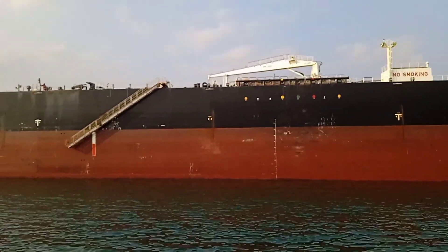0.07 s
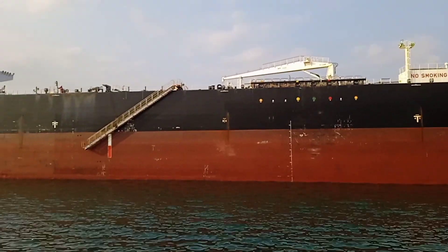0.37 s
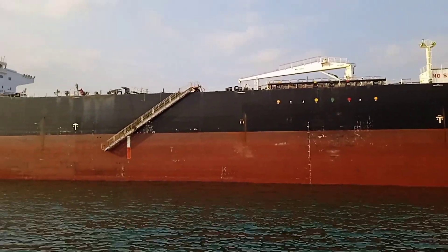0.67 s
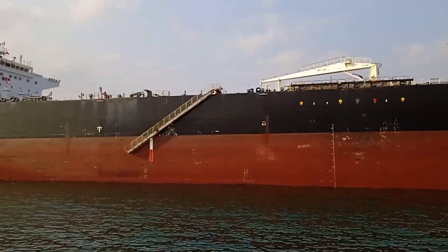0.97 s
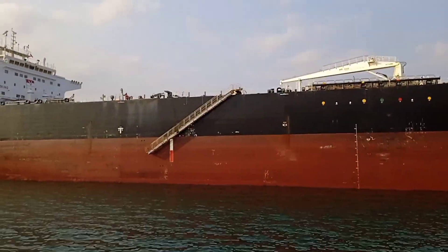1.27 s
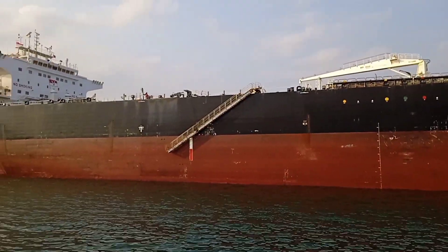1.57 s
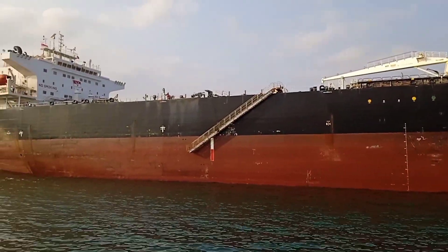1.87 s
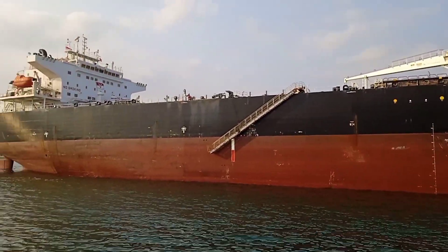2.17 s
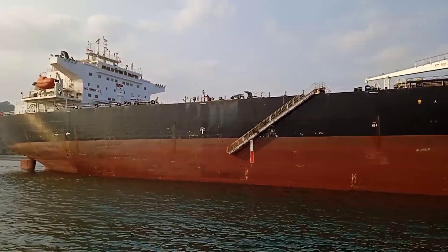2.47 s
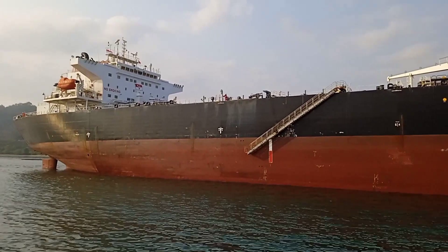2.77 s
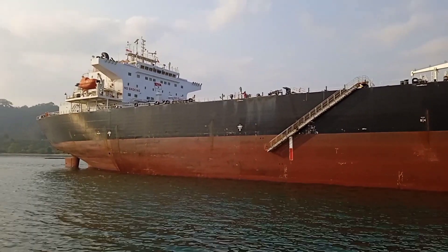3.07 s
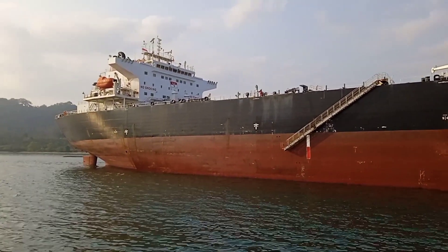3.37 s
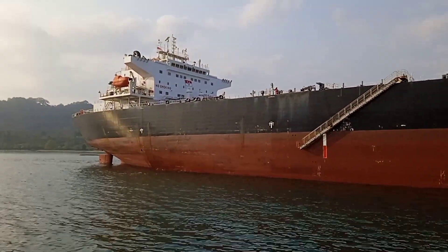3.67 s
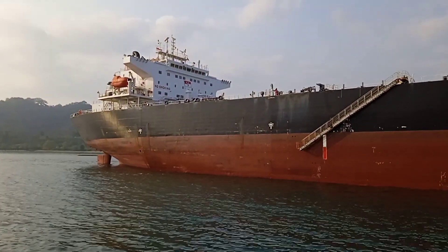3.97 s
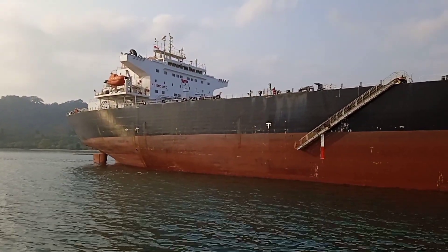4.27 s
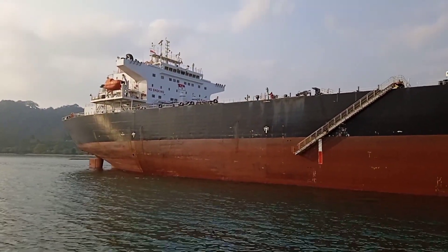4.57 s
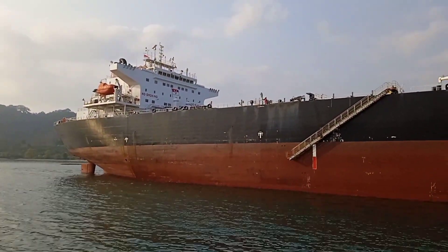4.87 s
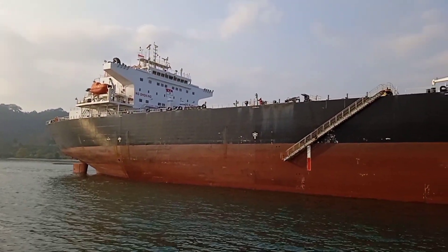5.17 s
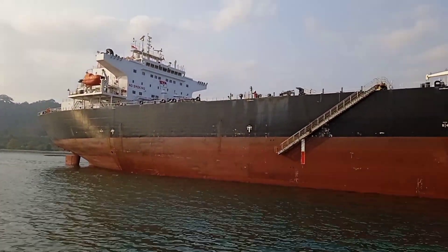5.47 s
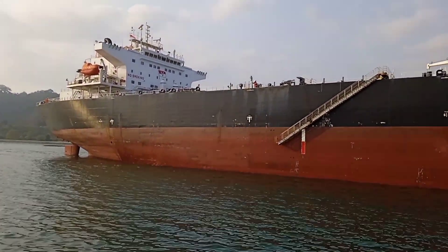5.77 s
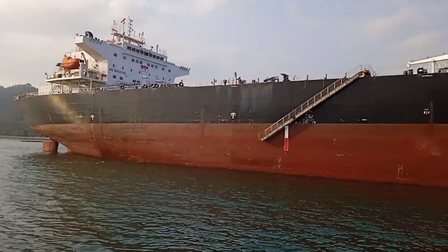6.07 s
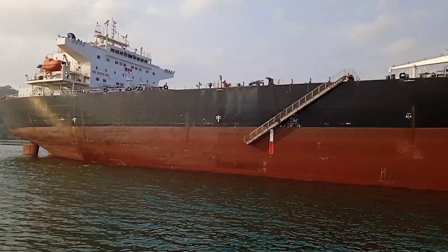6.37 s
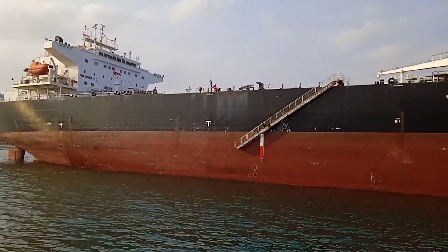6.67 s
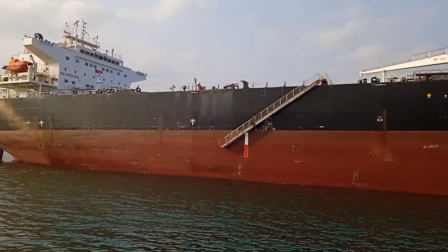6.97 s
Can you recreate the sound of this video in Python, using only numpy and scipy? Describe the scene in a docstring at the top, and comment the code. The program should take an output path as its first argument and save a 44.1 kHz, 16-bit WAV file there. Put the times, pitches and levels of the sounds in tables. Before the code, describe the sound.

A small boat's diesel engine chugs close by for the whole seven seconds, about ten beats a second, with a rattling block, a low puffing exhaust and some knocks harder than others. Behind it, a moored tanker's ventilation makes a steady airy roar with a faint wavering whirr and thin whistles. From the start until about 3.5 seconds, wind gusts buffet the microphone with soft low thumps, the loudest sounds, strongest around 1.1 to 1.4, 1.9, 2.9 and 3.4 seconds. The wind then drops to a light breeze, leaving the engine clearer, with small bumps near 5.6 and 6.8 seconds. Ripples fizz quietly against the hull throughout, and small droplets splash around 1.5, 2.7 and 6.5 seconds. Very faint bird pips come from the distant shore in the first second, just after 3 seconds and near 5.5 seconds.

```python
"""On the water beside a moored tanker, a small boat's five-cylinder diesel chugs steadily.
Each firing knocks, rattles the block and puffs from the exhaust, one cylinder knocking hardest.
The tanker's ventilation roars, whirrs and whistles, ripples fizz along its hull, droplets splash,
and birds pip faintly on the shore. Mostly in the first few seconds, gusts throw eddies
at the microphone, each a soft low thump."""
import sys
import numpy as np
from scipy import signal
from scipy.fft import rfft, irfft, next_fast_len
from scipy.io import wavfile
from scipy.ndimage import uniform_filter1d, map_coordinates

SR = 44100
rng = np.random.default_rng(int(sys.argv[2]) if len(sys.argv) > 2 else 0)


def to_wav(s):
    """Save 16-bit WAV."""
    ch = np.atleast_2d(s).T  # columns
    pcm = np.round(np.clip(ch, -1, 1) * 32767)  # PCM
    wavfile.write(sys.argv[1], SR, pcm.astype(np.int16))


N = 309582
CYCLE_HZ = 9.9445  # engine cycles a second; every cylinder fires once in each


def amp(db):
    """Amplitude ratio: a factor of ten for every 20 decibels."""
    return 10 ** (np.asarray(db) / 20)


def unit(x):
    """Normalisation to rms 1."""
    return x / np.sqrt(np.mean(x ** 2) + 1e-20)


def curves(rows):
    """Linear interpolation: one value per sample for each column after the time."""
    times, *columns = np.transpose(rows)
    return [np.interp(np.arange(N) / SR, times, column) for column in columns]


def wobble(rate_hz):
    """Smooth random modulation: a spline through rate_hz Gaussian values a second."""
    position = np.arange(N) * rate_hz / SR
    steps = np.arange(0, position[-1] + 1, 1 / 8)
    knots = rng.standard_normal(int(position[-1]) + 4)
    return np.interp(position, steps, map_coordinates(knots, [steps]))


def filtered(x, response):
    """Zero-phase filtering: the spectrum of x is multiplied by response(hz)."""
    size = next_fast_len(len(x) + 8192)
    hz = np.fft.rfftfreq(size, 1 / SR) + 1
    return irfft(rfft(x, size) * response(hz), size)[:len(x)]


def coloured(x, spectrum):
    """Spectral shaping by (frequency_hz, gain_db) points, returned at rms 1."""
    points_hz, gain_db = np.transpose(spectrum)
    log_hz = np.log(points_hz)
    return unit(filtered(x, lambda hz: amp(np.interp(np.log(hz), log_hz, gain_db, left=-120, right=-120))))


def band_noise(samples, centre_hz, octaves):
    """Band-limited noise of rms 1 under a Gaussian bell in log frequency."""
    white = rng.standard_normal(samples)
    return unit(filtered(white, lambda hz: np.exp(-.5 * (np.log2(hz / centre_hz) / octaves) ** 2)))


def fading_noise(depth_db):
    """Selective fading: bands of noise swell and sink on their own, as across moving air and water."""
    bands = signal.stft(rng.standard_normal(N), nperseg=1024)[2]
    fading = uniform_filter1d(rng.standard_normal(bands.shape), size=4, axis=0)  # smooth in frequency
    fading = uniform_filter1d(fading, size=7, axis=1)  # and in time
    return signal.istft(bands * amp(depth_db * unit(fading)), nperseg=1024)[1][:N]


def wavering_tone(hz, waver_rad, flutter_db):
    """Phase and amplitude modulation of a sine make it waver and flutter; rms 1."""
    phase = 2 * np.pi * np.cumsum(hz) / SR + waver_rad * wobble(70)
    flutter = 1.85 * np.tanh(wobble(32) / 1.8)  # extremes softly limited
    return unit(amp(flutter_db * flutter) * np.sin(phase))


def add(track, start_s, sound):
    """Superposition: mix a sound in from start_s, cut to the track."""
    at = np.arange(len(sound)) + round(start_s * SR)
    inside = (at >= 0) & (at < N)
    track[at[inside]] += sound[inside]


def diesel(block_db=-53.0, exhaust_db=-43.5, knock_hz=550, knock_width_s=.0023, t60_s=0.053, throb=0.35):
    """Impulse excitation: each firing knocks and sets the block rattling; the exhaust puffs in step."""
    # firings in one engine cycle: delay_s, knock_db, shake_db
    cylinders = [(-.001, -42, -2), (.015, -51, -4), (.0395, -47.5, -4), (.062, -52, -6.5),
                 (.079, -50, -4.5)]
    # hardest knocks of the first cylinder: time_s, level_db
    hard_knocks = [(.199, -36.5), (.602, -38), (.703, -38), (.904, -37), (1.003, -37), (1.808, -37),
                   (2.011, -35.5), (2.312, -35.5), (2.412, -36.5), (3.217, -37), (3.519, -37), (3.72, -38),
                   (3.82, -36), (3.921, -37), (4.121, -34), (4.223, -37.5), (4.323, -34.5), (4.726, -37),
                   (4.827, -37.5), (4.927, -37.5), (5.228, -38), (5.731, -37.5), (5.933, -37.5),
                   (6.032, -35.5), (6.334, -37.5), (6.433, -36.5), (6.838, -37.5)]
    # resonances of the engine block: frequency_hz, gain_db
    block_spectrum = [(150, -45), (240, -5), (292, 0.5), (330, 0), (357, -8.5), (380, -3.5), (450, -2.5),
                      (490, -3.5), (560, -8.5), (595, -5.5), (630, -10), (700, -7), (800, -8.5),
                      (1200, -27.5), (2500, -47)]
    # spectrum of the exhaust: frequency_hz, gain_db
    exhaust_spectrum = [(20, -20.5), (40, -11), (56, -6), (72, -3), (87, 0.5), (115, -4), (170, -1),
                        (260, -7), (400, -13), (900, -44), (3000, -92.5)]
    t = np.arange(SR // 10) / SR
    centred = t - t[-1] / 2
    cycle_starts = np.arange(-1, N / SR * CYCLE_HZ) / CYCLE_HZ
    decay = amp(-60 * t / t60_s) + amp(-15) * (1 - t / t[-1])  # a sharp blow, then the boat rattles
    knock = np.exp(-.5 * (centred / knock_width_s) ** 2) * np.sin(2 * np.pi * knock_hz * centred)
    knocks, rattles, puffs = np.zeros((3, N))
    for delay_s, knock_db, shake_db in cylinders:
        burst = decay * rng.standard_normal(len(t))  # each cylinder repeats its own rattle
        rattle = unit(filtered(burst, lambda hz: np.exp(-.5 * (np.log2(hz / 500) / 0.83) ** 2)))
        for firing_s in cycle_starts + delay_s:
            force = amp(0.5 * rng.standard_normal())
            hard = [amp(db) for time_s, db in hard_knocks if abs(time_s - firing_s) < 2 * knock_width_s]
            knock_gain = hard[0] if hard else force * amp(knock_db)
            add(knocks, firing_s + centred[0], knock_gain * knock)
            add(rattles, firing_s, force * amp(shake_db) * rattle)
            add(puffs, firing_s, force * amp(shake_db) * decay)
    loose_parts = unit(puffs * band_noise(N, 474, octaves=0.48))  # their play differs at each blow
    block = coloured(unit(rattles) + 0.85 * loose_parts, block_spectrum)
    exhaust = coloured(fading_noise(depth_db=1.74) * (1 + throb * unit(puffs)), exhaust_spectrum)
    return knocks + amp(block_db) * block + amp(exhaust_db) * exhaust


def engine_hum(flutter_db=3.4):
    """Engine orders: tones at multiples of the cycle rate drift in phase together."""
    # tones of the engine: cycle_multiple, level_db
    orders = [(6, -55), (8.7, -56), (17, -58), (29, -61), (38, -64), (48, -64), (50, -61)]
    cycles = CYCLE_HZ * np.arange(N) / SR + 0.005 * wobble(3)  # the governor hunts a little
    out = np.zeros(N)
    for multiple, level_db in orders:
        gain = amp(level_db + flutter_db * wobble(5.4))
        out += gain * unit(np.sin(2 * np.pi * (multiple * cycles + rng.random())))
    return out


def fan_roar(gain_db=4.0):
    """Broadband noise of the tanker's fans swells and fades as it propagates across the water."""
    # how well the roar carries: time_s, level_db
    carry = [(0, -56.5), (.7, -58), (1.2, -56.5), (1.7, -56.5), (2.05, -57), (3.3, -57.5), (3.62, -56),
             (3.95, -57.5), (5.2, -57.5), (7.02, -57)]
    # spectrum of the roar: frequency_hz, gain_db
    spectrum = [(100, -23.5), (350, 0), (650, 5.5), (900, 0), (1100, 1), (1420, -4), (1540, -1.5),
                (1850, -3.5), (2150, -8.5), (2700, -13.2), (3300, -20), (6000, -45.5)]
    level_db, = curves(carry)
    return amp(level_db + gain_db + 0.17 * wobble(17)) * coloured(fading_noise(depth_db=2.13), spectrum)


def duct_whirr(gain_db=-1.9, wander_hz=28):
    """Resonance: the air ducts whirr in short, wavering tones."""
    # swell of the whirr: time_s, level_db
    swell = [(0, -61), (.15, -66), (.4, -58.5), (.68, -69), (.85, -60.5), (1.1, -67), (1.5, -59.5),
             (2.05, -68.5), (2.17, -74), (2.5, -73), (2.63, -64), (3.3, -67.5), (3.58, -63), (3.92, -67),
             (4.1, -63), (4.45, -68), (4.9, -62), (5.55, -77), (5.85, -64.5), (6.5, -71), (6.75, -61.5),
             (7.02, -72)]
    # duct resonances: pitch_hz, level_db
    resonances = [(1570, -0.5), (1690, -1), (1815, -1)]
    swell_db, = curves(swell)
    tones = sum(amp(db) * wavering_tone(hz + wander_hz * wobble(14), waver_rad=1.1, flutter_db=7.5)
                for hz, db in resonances)
    return amp(swell_db + gain_db) * unit(tones)


def fan_whistles(wander_hz=3.0):
    """Tonal fan noise: three whistles drift and fade in the moving air."""
    # course of each whistle: time_s, pitch_hz, level_db
    low_fan = [(0, 1908, -71), (.3, 1915, -74), (.58, 1923, -87), (.75, 1923, -65.5), (1.6, 1926, -74.5),
               (2.3, 1920, -79), (2.7, 1912, -67.5), (3.6, 1933, -73.5), (4.3, 1906, -78), (4.6, 1907, -71),
               (5.35, 1908, -69.5), (5.95, 1900, -71), (6.3, 1904, -66), (6.55, 1911, -73),
               (7.02, 1910, -71)]
    middle_fan = [(0, 2056, -72), (.3, 2054, -67), (.5, 2050, -89), (1.7, 2090, -75.5), (2.4, 2050, -86),
                  (3.05, 2060, -79), (3.7, 2090, -67.5), (3.95, 2060, -85), (4.35, 2070, -72),
                  (4.7, 2100, -89), (6.2, 2040, -81), (6.5, 2038, -70), (6.8, 2038, -64), (7.02, 2030, -84)]
    high_fan = [(0, 2527, -72.5), (.45, 2527, -71), (.62, 2527, -77), (.8, 2527, -71.5), (1.9, 2528, -74),
                (2.4, 2528, -84), (3.6, 2530, -76), (5.1, 2529, -86), (5.5, 2528, -69), (5.85, 2528, -78),
                (6.15, 2528, -69.5), (6.6, 2528, -81), (7.02, 2528, -81)]
    out = np.zeros(N)
    for fan, waver_rad in [(low_fan, .22), (middle_fan, .25), (high_fan, .6)]:
        pitch_hz, level_db = curves(fan)
        out += amp(level_db) * wavering_tone(pitch_hz + wander_hz * wobble(8), waver_rad, flutter_db=3.7)
    return out


def ripples(gain_db=-0.1, grain_db=1.2):
    """Incoherent summation: countless small bursts in the ripples merge into a grainy fizz."""
    # swell of the fizz: time_s, level_db
    swell = [(0, -75.5), (.6, -75.5), (1.3, -77.5), (1.7, -74), (2.1, -77.5), (3.6, -77.5), (4.3, -78.5),
             (5.4, -75.5), (5.7, -79), (5.85, -74.5), (6.4, -76), (7.02, -77)]
    # spectrum of the water's fizz, plus a thin, very high hiss near 15 kHz: frequency_hz, gain_db
    spectrum = [(1500, -20.5), (3200, -3), (4300, 0.5), (5300, -5), (7000, -3.5), (8100, -13), (10000, -18),
                (11500, -23.5), (14000, -24.5), (15000, -15), (15500, -13.5)]
    level_db, = curves(swell)
    grains = fading_noise(depth_db=3.0) * amp(grain_db * wobble(700) + 0.71 * wobble(35))
    return amp(gain_db + level_db) * coloured(grains, spectrum)


def wavelets(gain_db=-0.5, crackle_db=3.0, lapping_db=-86, width_s=0.053):
    """Wavelets break against the hull; fast amplitude modulation of noise makes their spray crackle."""
    # washes against the hull: crest_s, level_db
    washes = [(.15, -76), (1.0, -83), (1.27, -76.5), (1.67, -79), (2.0, -85), (2.48, -83), (2.77, -76),
              (3.55, -80), (3.7, -83), (4.96, -80), (5.52, -84), (5.97, -84), (6.33, -79)]
    # spectrum of the water's spray, plus a thin, very high hiss near 15 kHz: frequency_hz, gain_db
    spectrum = [(2500, -11.5), (4400, 1.5), (7000, -1), (8300, -11), (13500, -19), (15400, -7)]
    t = np.arange(N) / SR
    surge = sum(amp(db) * np.exp(-.5 * ((t - crest_s) / width_s) ** 2) for crest_s, db in washes)
    crackle = rng.standard_normal(N) * amp(crackle_db * (wobble(900) + .5 * wobble(45)))
    return amp(gain_db) * np.hypot(surge, amp(lapping_db)) * coloured(crackle, spectrum)


def gusts(breeze_db=-53, rough_db=2.5, fall_s=0.032):
    """Turbulent pressure on the microphone: each gust builds, crests and drops back to a light breeze."""
    # gusts: crest_s, level_db, rise_s
    crests = [(.02, -32.5, 0.025), (.27, -37.5, 0.029), (.48, -33, 0.083), (0.861, -33, 0.11),
              (1.115, -32, 0.019), (1.371, -35, 0.11), (1.468, -36, 0.09), (1.7, -45, 0.21),
              (1.89, -32, 0.058), (2.18, -34.5, 0.07), (2.59, -33, 0.027), (2.711, -41, 0.031),
              (2.891, -30, 0.078), (3.44, -33.5, 0.06), (6.93, -44.5, 0.19)]
    # spectrum of the wind's flutter: frequency_hz, gain_db
    spectrum = [(25, -33.5), (45, -17.5), (65, 4.5), (100, 6), (210, 0.5), (400, -13), (700, -23),
                (1200, -44), (3000, -80)]
    t = np.arange(N) / SR
    strength = sum(amp(db) * np.exp(-np.maximum((crest_s - t) / rise_s, (t - crest_s) / fall_s))
                   for crest_s, db, rise_s in crests)
    turbulence = rng.standard_normal(N) * amp(rough_db * wobble(70))
    return np.hypot(strength, amp(breeze_db)) * coloured(turbulence, spectrum)


def eddies(gain_db=-2.5, swirl=0.26, puff_db=-14.5, puff_s=0.006, low_hz=55, top_hz=780):
    """Each passing vortex is a few uneven swings of pressure, wrapped in a puff of finer turbulence."""
    # strongest eddies: time_s, level_db, centre_hz, half_length_cycles
    vortices = [(.008, -31.5, 154, 0.89), (.025, -31, 248, 0.93), (0.44, -28, 176.4, 0.77),
                (0.508, -29.5, 148, 0.7), (0.819, -35, 124, 0.93), (0.866, -27, 201, 0.77),
                (1.098, -30.5, 152, 0.84), (1.111, -23, 274, 0.72), (1.127, -24, 197, 0.61),
                (1.164, -28.5, 149, 0.67), (1.243, -26, 229, 1.04), (1.304, -29, 261, 1.1),
                (1.315, -22.5, 510, 1), (1.324, -25.5, 209, 0.75), (1.334, -30, 151, 0.63),
                (1.364, -25, 176, 0.75), (1.378, -20, 443, 0.29), (1.382, -29, 189, 0.62),
                (1.397, -22.5, 228, 0.4), (1.845, -26, 142, 0.8), (1.891, -23.5, 325, 0.7),
                (1.908, -30, 282, 0.45), (2.118, -29, 200, 1.3), (2.151, -27.5, 165, 0.5),
                (2.166, -27.5, 161, 0.78), (2.195, -32, 132, 0.94), (2.222, -29, 126, 1.05),
                (2.541, -27, 128, 0.64), (2.567, -22, 209.6, 0.565), (2.572, -25.5, 398, 1.4),
                (2.681, -27, 202, 0.61), (2.717, -31, 230, 0.84), (2.848, -24, 155, 0.54),
                (2.877, -25, 245, 0.65), (2.894, -17, 255.5, 1.06), (2.927, -31.5, 160, 0.56),
                (3.357, -29.5, 164, 1.02), (3.415, -27.5, 189, 0.92), (3.427, -25, 168.4, 0.74),
                (3.438, -18, 213, 0.55), (5.606, -29, 228.5, 1.06), (6.095, -32.5, 141, 0.36),
                (6.81, -33, 110, 0.82)]
    out, t = np.zeros(N), np.arange(-SR // 30, SR // 30) / SR
    for time_s, level_db, centre_hz, cycles in vortices:
        swell = 1 / np.cosh(t * centre_hz / cycles)  # small eddies are higher and pass sooner
        uneven = np.tanh(band_noise(len(t), 141.4, octaves=0.44))
        swing_hz = centre_hz * (.6 + 0.44 * swell) * np.exp(swirl * uneven)  # fastest in the core
        swing = np.sin(2 * np.pi * (np.cumsum(swing_hz) / SR + rng.random()))
        puff = band_noise(len(t), 400, octaves=0.36) / np.cosh(t / puff_s)
        thump = swell * unit(swing) + amp(puff_db) * puff
        add(out, time_s + t[0], amp(level_db + gain_db) * thump)
    return filtered(out, lambda hz: 1 / np.sqrt((1 + (low_hz / hz) ** 4) * (1 + (hz / top_hz) ** 10)))


def birds(gain_db=1.0):
    """Narrow-band noise is heard as a pitch: short, slightly hoarse pips from the wooded shore."""
    # distant bird calls: time_s, level_db, pitch_hz, half_length_s
    pips = [(.42, -78, 3900, .014), (.68, -75, 3950, .011), (.73, -74, 3800, .007), (.79, -82, 6080, 0.011),
            (0.832, -76, 3900, 0.008), (0.883, -77, 3900, 0.0062), (0.988, -72, 3940, .009),
            (3.015, -78.5, 6130, 0.019), (3.33, -80, 6060, .011), (5.52, -71, 3790, .009)]
    out, t = np.zeros(N), np.arange(-SR // 20, SR // 20) / SR
    for time_s, level_db, pitch_hz, half_length_s in pips:
        voice = band_noise(len(t), pitch_hz, octaves=0.02)
        envelope = np.exp(-.5 * (t / half_length_s) ** 2)
        add(out, time_s + t[0], amp(level_db + gain_db) * envelope * voice)
    return out


def droplets(gain_db=-5):
    """Damped transients: each splash is a band of noise that rises fast and decays exponentially."""
    # splashing droplets: start_s, level_db, centre_hz, width_octaves, t60_s
    drops = [(1.243, -69, 6800, 0.7, .11), (1.456, -54.5, 4200, .27, 0.069), (1.51, -57, 4000, 0.27, .08),
             (1.668, -54, 3700, 0.33, 0.048), (1.998, -72, 11000, .5, .03),
             (2.745, -59.5, 6600, 0.26, 0.061), (5.533, -70, 13500, .6, .02),
             (6.532, -53, 6300, 0.39, 0.0096), (6.608, -65, 9500, 0.18, .012),
             (6.62, -55, 15400, 0.25, 0.006)]
    out, t = np.zeros(N), np.arange(SR // 10) / SR
    for start_s, level_db, centre_hz, octaves, t60_s in drops:
        attack = 1 - np.exp(-20 * t / t60_s)
        decay = amp(level_db + gain_db - 60 * t / t60_s)
        add(out, start_s, attack * decay * band_noise(len(t), centre_hz, octaves))
    return out


def scene():
    """Superposition of engine, ship, water, wind and shore at one microphone."""
    engine = diesel() + engine_hum()
    ventilation = fan_roar() + duct_whirr() + fan_whistles()
    return (engine + ventilation + ripples() + wavelets() + gusts() + eddies() + birds() + droplets())[None]


def record(dry, low_hz=40, top_hz=15500):
    """Band limiting: the microphone thins the deepest bass and passes nothing above top_hz."""
    return filtered(dry[0], lambda hz: (hz < top_hz) / np.sqrt(1 + (low_hz / hz) ** 4))[None]


dry = scene()
out = record(dry)
to_wav(out)
```